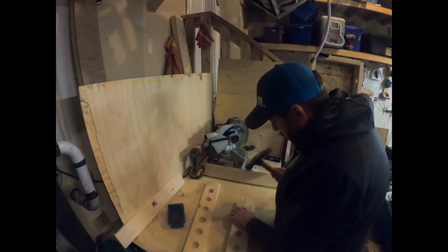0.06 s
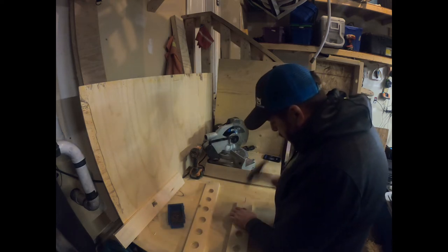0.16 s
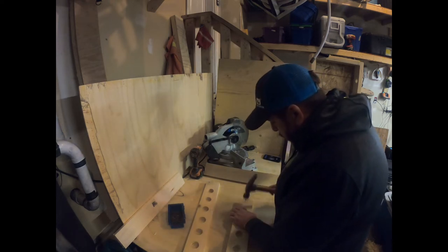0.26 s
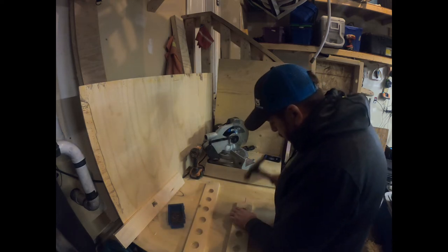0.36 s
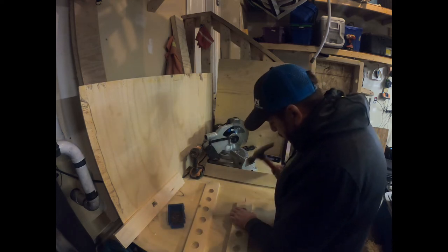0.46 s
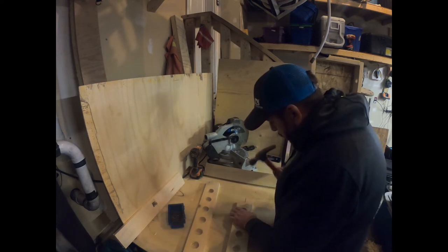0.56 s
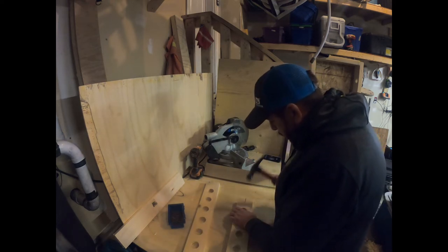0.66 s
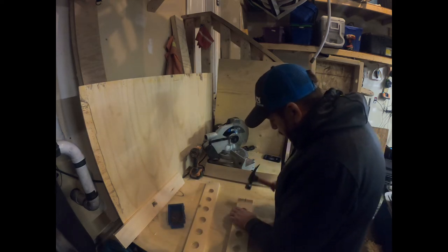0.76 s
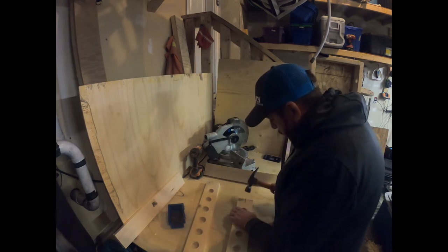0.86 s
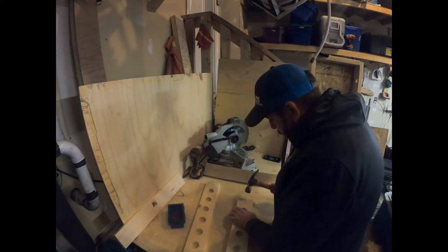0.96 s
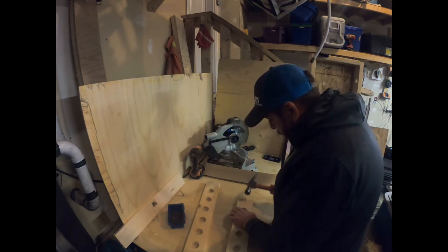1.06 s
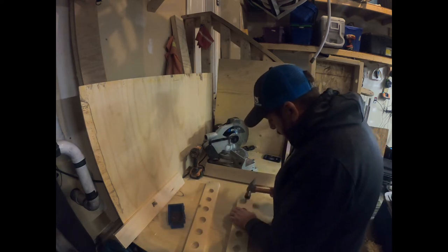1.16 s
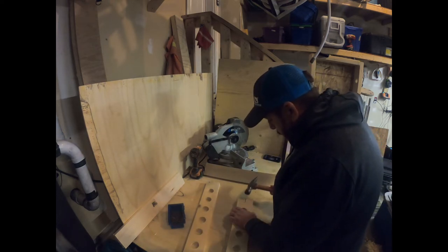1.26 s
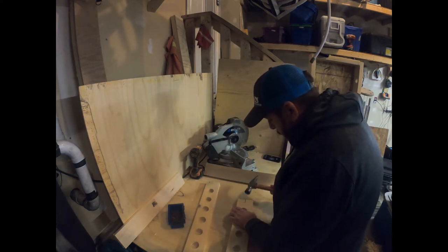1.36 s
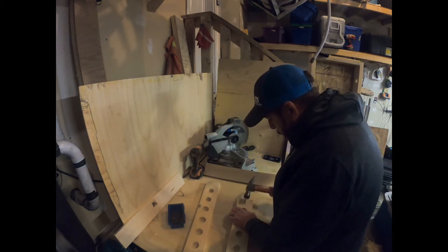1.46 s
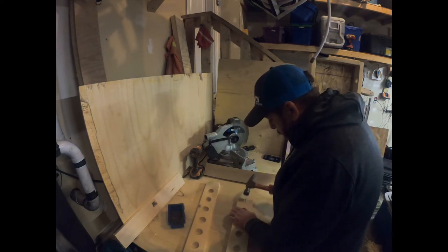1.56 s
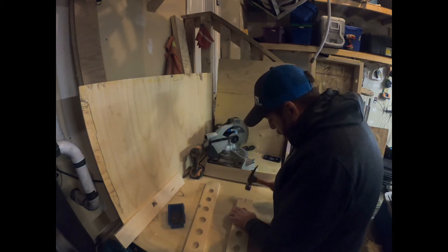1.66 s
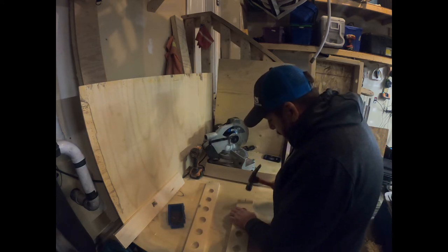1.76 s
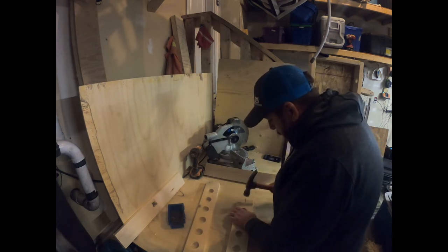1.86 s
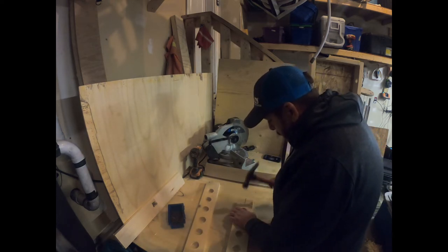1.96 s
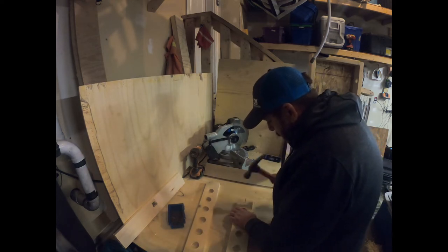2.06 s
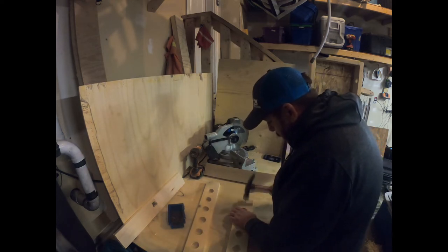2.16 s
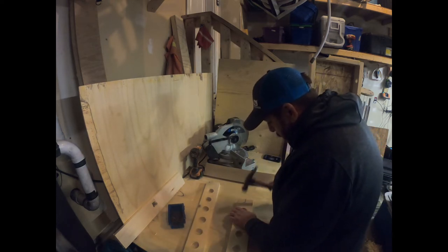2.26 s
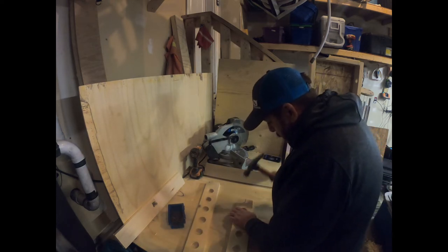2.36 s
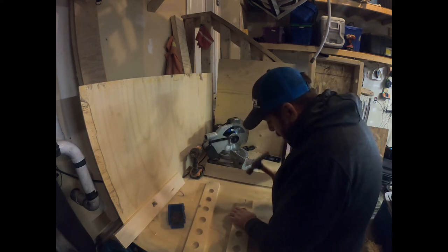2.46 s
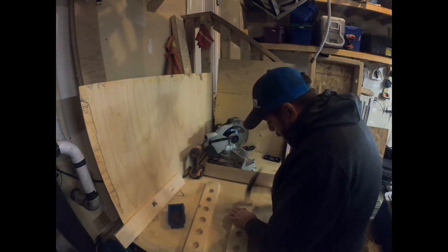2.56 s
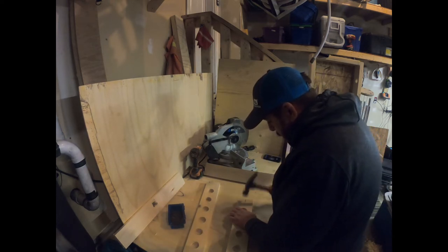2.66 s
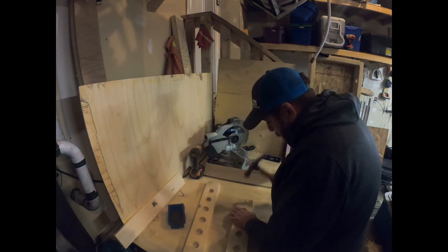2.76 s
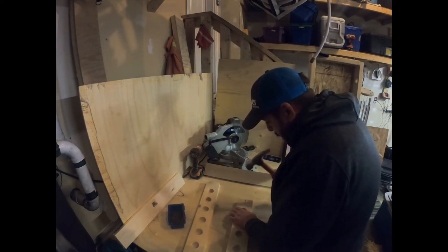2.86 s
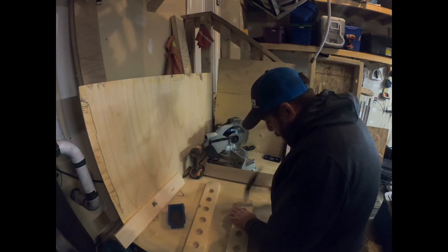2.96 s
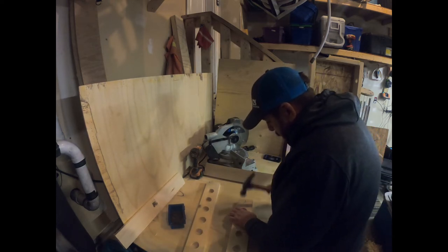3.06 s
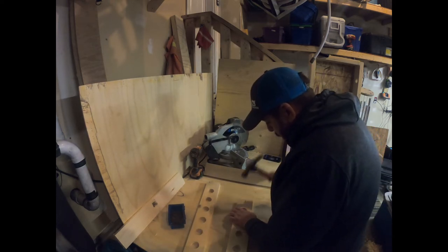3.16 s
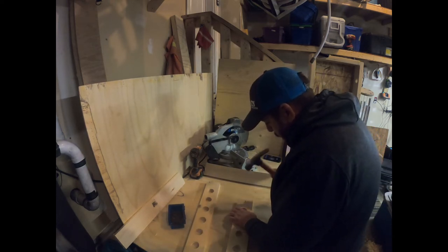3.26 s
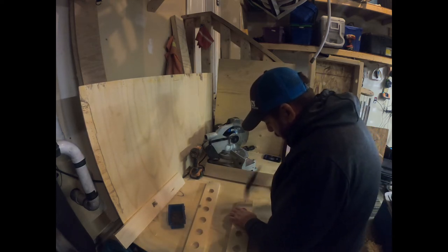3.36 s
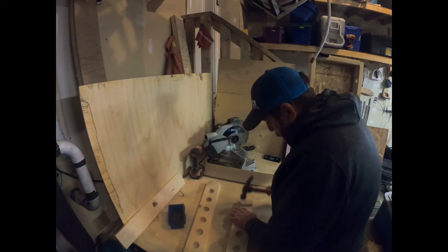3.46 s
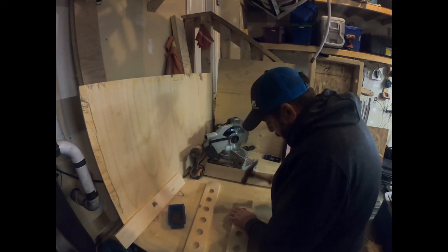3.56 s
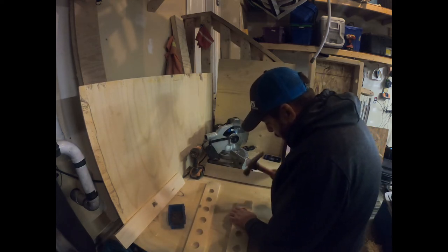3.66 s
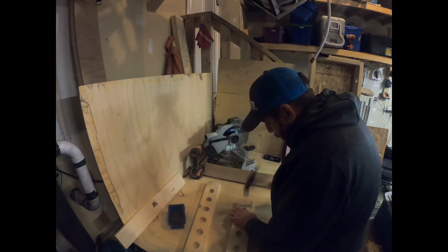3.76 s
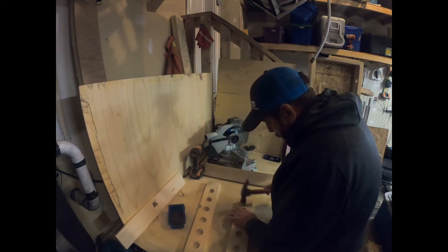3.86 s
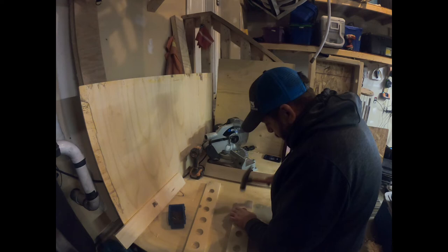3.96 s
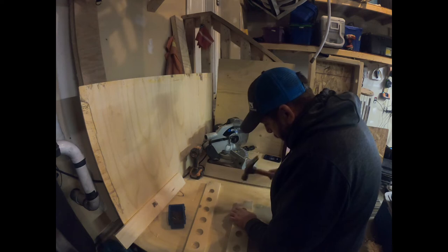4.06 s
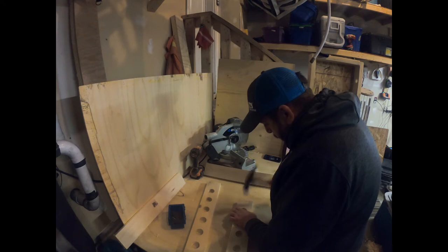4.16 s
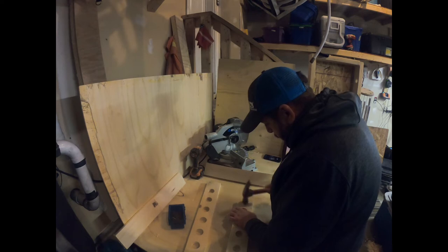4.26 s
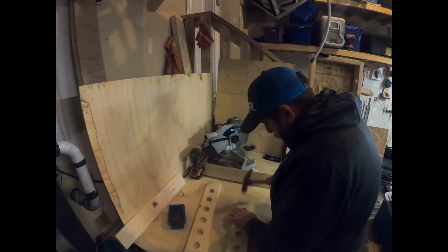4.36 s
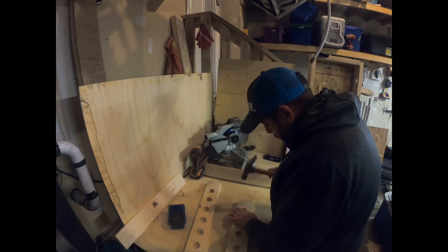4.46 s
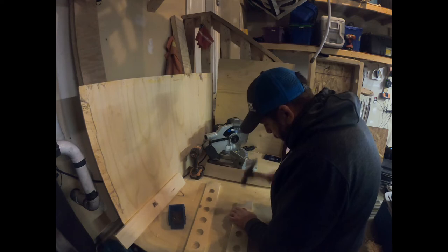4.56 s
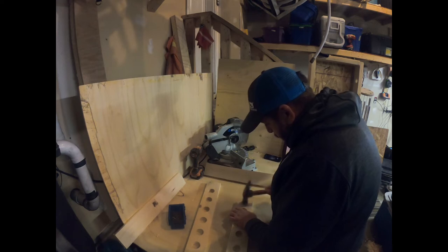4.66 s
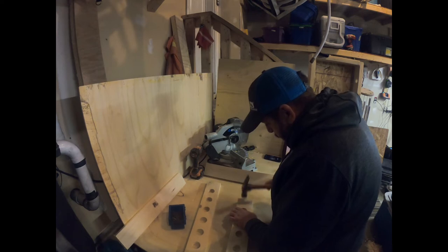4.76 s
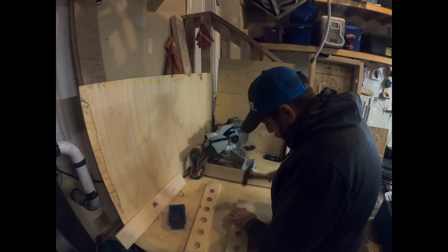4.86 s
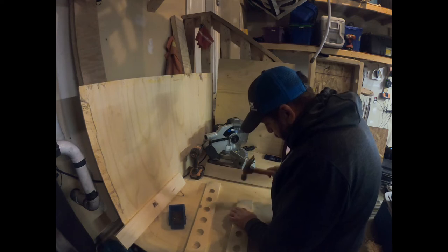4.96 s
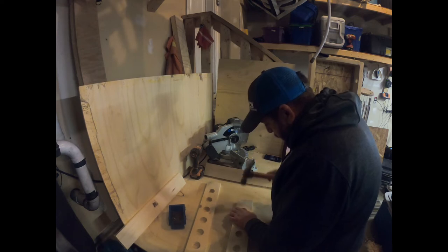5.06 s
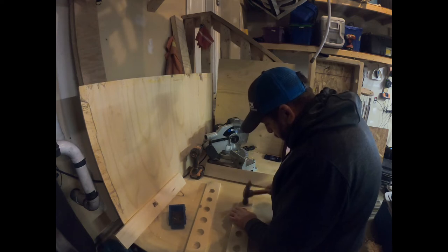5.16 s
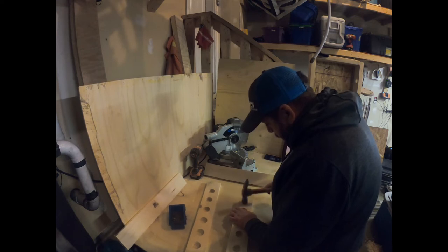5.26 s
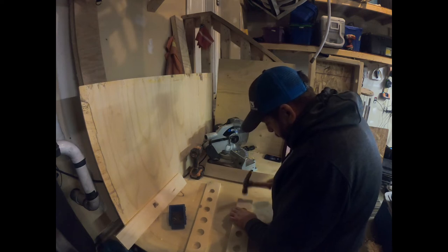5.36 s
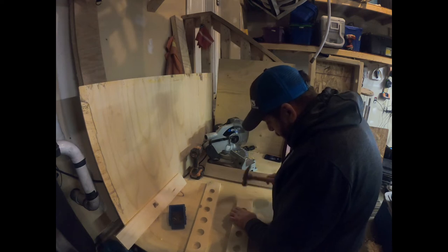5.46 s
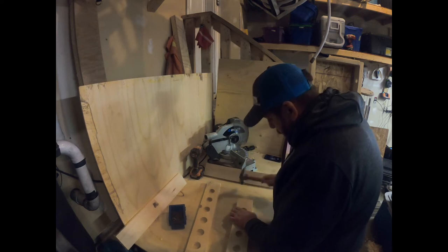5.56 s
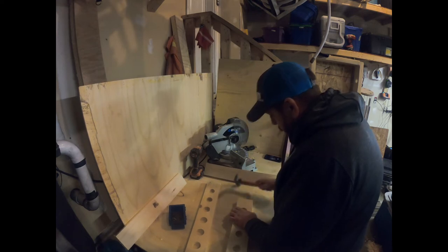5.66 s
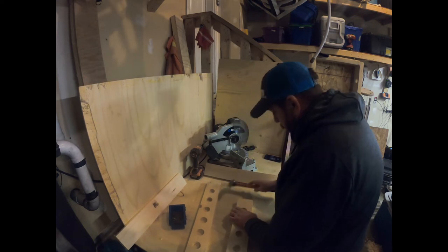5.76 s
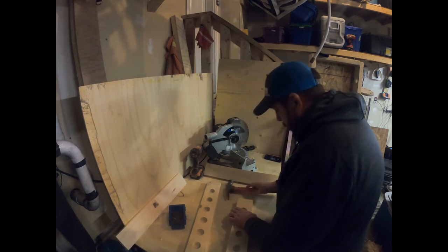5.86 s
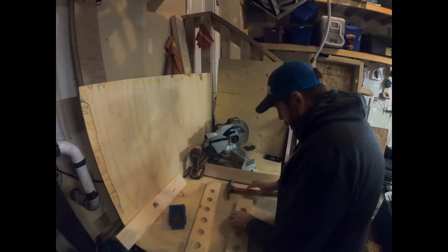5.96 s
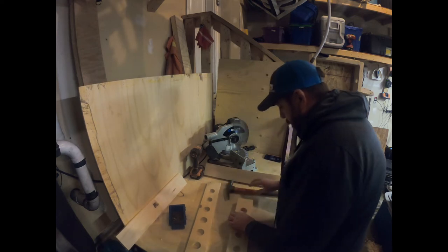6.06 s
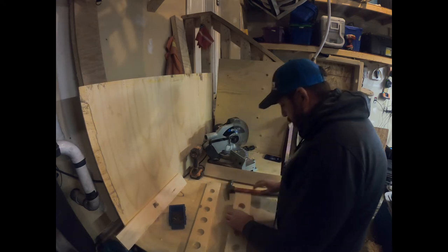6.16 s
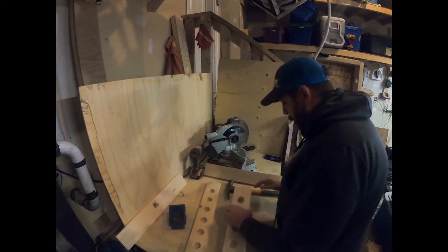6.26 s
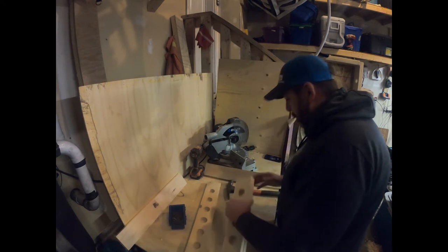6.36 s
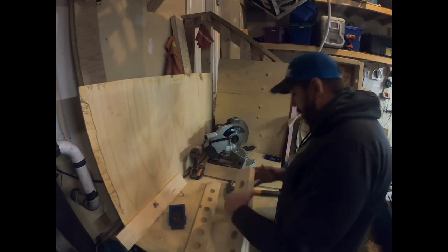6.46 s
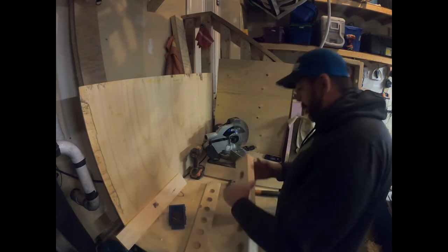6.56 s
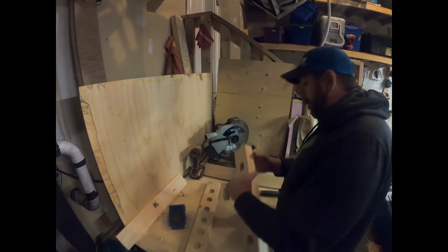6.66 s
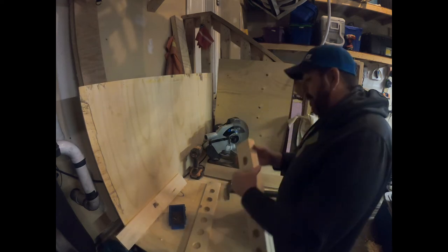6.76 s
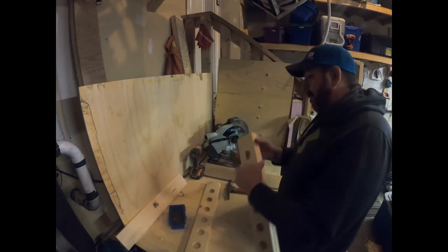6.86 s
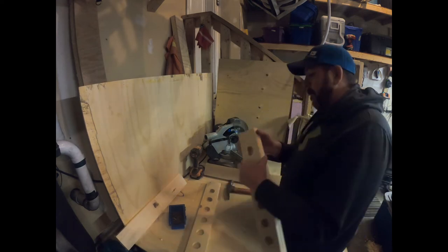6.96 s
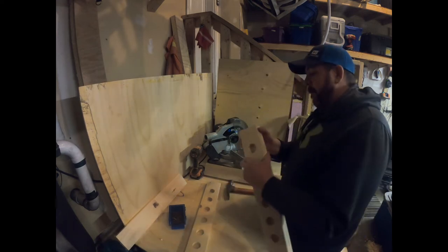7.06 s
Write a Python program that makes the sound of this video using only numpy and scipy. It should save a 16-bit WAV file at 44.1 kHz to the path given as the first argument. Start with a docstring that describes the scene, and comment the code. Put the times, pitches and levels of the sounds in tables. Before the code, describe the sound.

Heard close in stereo in a small workshop, a hammer strikes a nail in wood: one blow, two faint taps, then eight strong evenly spaced blows. Each cracks sharply, booms through the bench and shakes loose things into ticks. The hammer clunks down, then a wooden block drags off with grainy, squeaky friction over quiet hum.

```python
"""Hammering a nail at a workbench

A hammer drives a nail into a block on a wooden bench in a small workshop, heard close by in stereo.
Each blow cracks as ringing steel modes, booms late through the bench and makes loose things jump and land
as clumps of ticks; band-by-band dying noise is the room. Two light taps come between the first two blows.
Then the hammer is laid down and the block slides off as grainy, squeaking friction noise, over a quiet hum."""
import sys
import numpy as np
from scipy import signal
from scipy.io import wavfile

SR = 44100
rng = np.random.default_rng(int(sys.argv[2]) if len(sys.argv) > 2 else 0)


def wrap_up_sound(samples):
    """Save the sound to the file named by the first command line argument, as 16-bit audio."""
    columns = np.atleast_2d(samples).T
    # keep every value between -1 and 1, then stretch to whole-number steps
    tamed = np.clip(columns, -1, 1)
    steps = np.round(tamed * 32767).astype(np.int16)
    wavfile.write(sys.argv[1], SR, steps)


N = 313110

# hammer blows on the nail: start_s, force_db, woody (0 = booming blow, 1 = blow with more woody body),
# bench_shake_db, block_ring_db [s, dB, -, dB, dB]
BLOWS = [(0.2484, 9.5, 0.56, 2.5, -1.5), (2.206, 11, 0.88, 0.5, -3), (2.6225, 14.5, 0, -2.5, 3),
         (3.024, 13, 0, -2.5, 3.5), (3.4271, 9, 0.01, -0.1, 7), (3.8357, 13, 0, -0.7, 2.1),
         (4.243, 10, 0.42, -2, -1.2), (4.6704, 10.5, 0.82, 2.5, -3), (5.1962, 10, 0, -3.5, 6.5)]
# light taps, a touch and then the knock: touch_s, touch_db, knock_s, knock_db [s, dB, s, dB]
TAPS = [(1.165, -27.5, 1.1762, -18.5), (1.483, -27, 1.4915, -16)]
# the hammer tumbles down on the bench: start_s, steel_crack_db, bench_thud_db, woody_knock_db,
# bright_clack_db [s, dB, dB, dB, dB]
SET_DOWN = [(5.7107, -19.5, -14.5, -12, -41), (5.826, -26.5, -19, -15, -51.5),
            (5.8917, -1.5, -6.5, 0.5, -22), (6.0058, -18.5, -19, -8, -38.5), (6.018, -25, -11, -29, -44)]
# loose things landing on the bench, mostly thrown up by a blow: start_s, treble_db, thump_db [s, dB, dB]
LANDINGS = [(0.301, -5.5, -8.5), (0.3124, -19.5, -17), (2.266, -11.5, -17.5), (2.68, -6.5, -9),
            (3.096, -9.5, -22), (3.501, -10.5, -17.5), (3.919, 8.5, 0.5), (4.322, -13, -18),
            (4.754, -14, -29), (4.966, -50.5, -61.5), (5.026, -61.5, -77), (5.049, -64.5, -57.5),
            (5.157, -58, -49), (5.25, -19.5, -25), (5.72, -35, -31), (5.829, -42, -64.5),
            (6.018, -54.5, -65), (6.481, -62, -73)]
# modes of the bench top: pitch_hz, relative level_db, t60_s [Hz, dB, s]
BENCH_MODES = [(142.8, 8.5, 0.12), (188, -1.5, 0.015), (256, -6.5, 0.27)]
# modes of the wood being nailed: pitch_hz, relative level_db, t60_s [Hz, dB, s]
BLOCK_MODES = [(364, -0.5, 0.12), (482, -3, 0.08), (616, 0.5, 0.088), (729, -0.5, 0.1), (850, -4, 0.09),
               (945, -1, 0.06), (1197, -2, .08), (1550, -8.5, .05)]


def amp(db):
    """dB to gain."""
    return 10 ** (np.asarray(db) / 20)


def rms_one(x):
    """Scale to unit rms."""
    return x / np.sqrt(np.mean(x ** 2) + 1e-20)


def at_hz(points, hz, column=1):
    """Read a spectrum table on a log-frequency axis."""
    points = np.array(points)
    return np.interp(np.log(hz), np.log(points[:, 0]), points[:, column])


def in_time(rows, column):
    """Read a curve column at every sample."""
    rows = np.array(rows)
    return np.interp(np.arange(N) / SR, rows[:, 0], rows[:, column])


def clicks(rows, column, extra_db=0):
    """One click per event, sized by a dB column, over an inaudible floor."""
    out, rows = np.full(N, 1e-18), np.array(rows)
    out[np.round(rows[:, 0] * SR).astype(int)] = amp(rows[:, column] + extra_db)
    return out


def butter(x, hz, kind):
    """Second-order Butterworth filter design, low, high or band."""
    return signal.sosfilt(signal.butter(2, hz, kind, fs=SR, output="sos"), x)


def band_noise(hz, width_hz):
    """A narrow band of noise at unit rms."""
    edges_hz = [hz - width_hz / 2, hz + width_hz / 2]
    return rms_one(butter(rng.standard_normal(N), edges_hz, "band"))


def ring(x, hz, t60):
    """A two-pole resonator: a unit click sets a decaying sine of height 1 ringing."""
    r, w = amp(-60 / (t60 * SR)), 2 * np.pi * hz / SR
    return signal.lfilter([0, np.sin(w)], [1, -2 * r * np.cos(w), r * r], x)


def fade(power, t60):
    """Sound energy dying away by 60 dB in t60 seconds."""
    return signal.lfilter([1], [1, -amp(-120 / (t60 * SR))], power)  # -120 because this is power


def flicker(size, per_s):
    """A random curve: straight lines between points of unit spread."""
    knots = rng.standard_normal(int(size / SR * per_s) + 2)
    return np.interp(np.arange(size) / SR * per_s, np.arange(len(knots)), knots)


def stereo_bands(size, gain_at):
    """Third-octave bands of stereo noise, each with its own gain, likeness and balance."""
    # left-right likeness: pitch_hz, likeness (clipped to -1..1) [Hz, -]
    likeness = [(100, 0.99), (300, 1), (600, 0.76), (1200, 0.32), (2500, .6), (5000, 0.25), (9000, -0.24),
                (14000, -2.4)]
    # stereo balance: pitch_hz, left_minus_right_db [Hz, dB]
    left_more = [(60, -1.5), (180, 2), (550, -1), (1650, -1), (4970, 1), (15000, -2)]
    out, edges = 0, 28 * 2 ** (np.arange(28) / 3)
    white = rng.standard_normal((2, 2, size))
    for k, (low, high) in enumerate(zip(edges, edges[1:])):
        mid, side = butter(white[k % 2], [low, high], "band")
        hz = np.sqrt(low * high)
        alike = np.clip(at_hz(likeness, hz), -1, 1)
        lean = amp(at_hz(left_more, hz) / 2)
        left, right = np.sqrt(1 + alike) * mid + np.sqrt(1 - alike) * side * [[1], [-1]]
        out = out + gain_at(hz) * np.array([left * lean, right / lean])
    return out


def contacts():
    """Every knock as (s, force dB, then relative dB of deep boom, bench, body, treble), from its kind."""
    # how each kind of contact shares its force: deep_db, bench_db, body_db, treble_db [relative dB]
    booming_blow, woody_blow = [-7.5, -14, -10.5, -19.5], [-18.5, -18, -1, -19.5]
    touch_share, tap_share = [-45, -32, -5, -5], [-41, -35, -6, -14]
    # the laid-down hammer, without treble: deep_db, bench_db, body_db [relative dB]
    thud_share = [-22.5, -10, -1.5]
    rows = []
    for s, db, woody, shake_db, block_db in BLOWS:
        blow_share = np.add(booming_blow, woody * np.subtract(woody_blow, booming_blow))
        rows.append((s, db, *(blow_share + [shake_db, shake_db, block_db, 0])))
    for touch_s, touch_db, knock_s, knock_db in TAPS:
        rows.append((touch_s, touch_db, *touch_share))
        rows.append((knock_s, knock_db, *tap_share))
    for s, db, thud_db, wood_db, clack_db in SET_DOWN:
        share = np.add(thud_share, [thud_db - db, thud_db - db, wood_db - db])
        rows.append((s, db, *share, clack_db - db))
    return np.array(rows)


def knocks(column, extra_db=0):
    """One click per knock: its force plus the share of one range; column 1 is the bare force."""
    rows = contacts()
    share_db = rows[:, column] if column > 1 else 0
    return clicks(rows, 1, extra_db + share_db)


def struck(modes, column, spread_db):
    """Every knock strikes every mode with its own strength; neighbouring modes start in opposite directions."""
    spread = rng.normal(0, spread_db, (len(contacts()), len(modes)))
    out = 0
    for k, (hz, db, t60) in enumerate(modes):
        out = out + (-1) ** k * ring(knocks(column, db + spread[:, k]), hz, t60)
    return out


def landings():
    """Each landing as (s, treble dB, body dB), the body 9 dB over the treble."""
    return np.array([(s, db, db + 9) for s, db, _ in LANDINGS])


def hum():
    """A wavering hum and faint flickering hiss: shaped noise whose bands waver together and apart."""
    # pitch_hz, relative level_db per Hz [Hz, dB]
    hum_colour = [(18, -29), (30, -8.5), (110, -11), (158, 2.5), (267, -8), (552, -20.5), (645, -8),
                  (698, -36.5), (837, -5.5), (1140, -22.5), (3880, -27.5), (4200, -19), (6040, -35.5),
                  (7630, -17.5), (15000, -60.5)]
    together = flicker(N, per_s=3.9)

    def gain(hz):
        return amp(at_hz(hum_colour, hz) + 1.0 * together + 1.3 * flicker(N, per_s=3.4))
    return amp(-70) * rms_one(stereo_bands(N, gain))


def crack():
    """A few ms of steel on nail head and block with a bright ping, straight and again off bench and board."""
    # steel meets nail head and block: pitch_hz, relative level_db, t60_s [Hz, dB, s]
    crack_modes = [(2600, 0, 0.007), (3500, -8, 0.01), (1850, -3, 0.01), (1215, -5, .016), (700, -8, .012)]
    # bright ring of the hammer head: pitch_hz, relative level_db, t60_s [Hz, dB, s]
    ping_modes = [(4440, 5, 0.0031), (6150, 2, 0.0043), (6880, -2.5, 0.036), (7100, 1, 0.0067),
                  (8370, -4, 0.063)]
    # direct, off the bench top, off the back board: delay_s, relative level_db, left_minus_right_db [s, dB, dB]
    arrivals = [(.0008, -3, -6), (.00117, -3, -6), (.0023, 4, 0)]
    # the contact is not quite instant, which softens it above 3800 Hz
    snap = butter(struck(crack_modes, column=1, spread_db=2.5), 3800, "low")
    ping = amp(-2) * struck(ping_modes, column=5, spread_db=4.0)
    direct = ping - snap
    out = 0
    for s, db, lean_db in arrivals:
        left_right = amp(db + np.array([[lean_db / 2], [-lean_db / 2]]))
        out = out + left_right * np.roll(direct, round(s * SR))
    return amp(-13) * out


def boom(delay_s=0.0049):
    """The heavy bench gives way late and softly, slowest on its legs; its edge and the block answer at once."""
    # bench on its legs: pitch_hz, relative level_db, t60_s [Hz, dB, s]
    leg_modes = [(46, -13, 0.26), (61.6, -10.5, 0.26), (94.3, 5.5, 0.086)]
    # bench where the hammer is laid: pitch_hz, relative level_db, t60_s [Hz, dB, s]
    edge_modes = [(165.4, 3, 0.09), (284, -5, 0.083), (380.4, -2.5, 0.088), (494, -8, 0.051)]
    legs = amp(5.0) * butter(struck(leg_modes, column=2, spread_db=2.5), 110, "low")
    top = amp(3.5) * struck(BENCH_MODES, column=3, spread_db=1.9)
    late = np.roll(butter(legs + top, 800, "low"), round(delay_s * SR))
    edge = sum(ring(clicks(SET_DOWN, 2, db - 1), hz, t60) for hz, db, t60 in edge_modes)
    block = amp(-19) * butter(struck(BLOCK_MODES, column=4, spread_db=5.5), 1800, "low")
    return late - butter(edge, 700, "low") + block


def shudder():
    """Bench and shelves keep shaking unevenly: noise in low resonances, dying slowly after each blow."""
    # pitch_hz, width_hz, relative level_db, t60_s [Hz, Hz, dB, s]
    resonances = [(153, 60, -36.5, 0.73), (268, 58, -35, 0.55)]
    power = clicks(BLOWS, column=1) ** 2
    out = 0
    for hz, width_hz, db, t60 in resonances:
        out = out + amp(db) * np.sqrt(fade(power, t60)) * band_noise(hz, width_hz)
    return out


def steel(damped_db=-10):
    """The nail sings faintly, less on the woodier blows; light taps ring in wood and a loose piece answers."""
    # nail and hammer head: pitch_hz, relative level_db, t60_s [Hz, dB, s]
    nail_modes = [(1432, -77, 1.2), (2935, -79, 1.5)]
    # what a light tap sets ringing: pitch_hz, relative level_db, t60_s [Hz, dB, s]
    wood_modes = [(200.5, -4.5, .12), (703, -3, 0.047), (1980, -5, 0.015), (6170, -19, 0.05)]
    # something loose ringing after a tap: pitch_hz, relative level_db, t60_s [Hz, dB, s]
    loose_modes = [(1240, -12.5, 0.075), (894, -20, 0.1), (295, -10, 0.16)]
    blows = np.array(BLOWS)
    nail = sum(ring(clicks(blows, 1, db + damped_db * blows[:, 2]), hz, t60) for hz, db, t60 in nail_modes)
    taps = np.array(TAPS)[:, 2:]
    wood = sum(ring(clicks(taps, 1, db), hz, t60) for hz, db, t60 in wood_modes)
    late_taps = taps + [0.022, 0]  # seconds
    loose = sum(ring(clicks(late_taps, 1, db), hz, t60) for hz, db, t60 in loose_modes)
    return nail + wood + loose


def workshop():
    """Boards and walls answer knocks and landings with dense noise: a quick early part and tails per band."""
    # pitch_hz, relative level_db, t60_s [Hz, dB, s]
    room_bands = [(41.3, -7.5, 0.059), (83, 11.5, 0.36), (141, 22.5, 0.18), (264, 14.5, 0.29),
                  (694, 1, 0.27), (1615, -7, 0.26), (2280, -13, 0.27), (4300, -10, 0.25),
                  (8700, -6.5, 0.23), (9800, -15.5, 0.031), (15000, -20, 0.042)]
    # centres of the deep, bench, body, crack and treble ranges [Hz]
    range_hz = [70, 200, 750, 2500, 6500]
    first_wall_s, landing_delay_s, landing_room_db = 0.003, 0.005, -4.5
    early_db, early_t60_s = -4, 0.0063
    late_db, late_t60_s, late_top_hz = -30, 0.62, 3470  # far corners ring on, softer and duller
    blows, drops = contacts(), landings()
    shares = np.insert(blows[:, 2:], 3, 0, axis=1)  # the crack range takes the bare force

    def struck_power(hz):
        share_db = np.array([np.interp(np.log(hz), np.log(range_hz), row) for row in shares])
        knocked = np.roll(clicks(blows, 1, share_db), round(first_wall_s * SR))
        # landings: weak lows, then a blend from body to treble level, reaching treble at 5 kHz
        tilt = np.interp(np.log(hz), np.log([400, 1500, 3000, 5000]), [-15, 0, 0, 1])
        blend_db = drops[:, 2] + (drops[:, 1] - drops[:, 2]) * max(tilt, 0)
        landed_db = blend_db + min(tilt, 0) + landing_room_db
        landed = clicks(np.c_[drops[:, 0] + landing_delay_s, landed_db], column=1)
        return knocked ** 2 + landed ** 2

    def dying(hz):
        # energy builds over a cycle or two plus a fraction of a ms
        swell = np.exp(-hz / (1.5 * SR + 0.00015 * hz * SR))
        power = signal.lfilter([1 - swell], [1, -swell], struck_power(hz))
        early = amp(2 * early_db) * fade(power, early_t60_s)
        tail = fade(power, at_hz(room_bands, hz, column=2))
        late = amp(2 * late_db) / (1 + (hz / late_top_hz) ** 2) * fade(power, late_t60_s)
        patchy_db = 2.6 * flicker(N, per_s=35) + 2.0 * flicker(N, per_s=11)
        return amp(at_hz(room_bands, hz) + patchy_db) * np.sqrt(early + tail + late)
    return stereo_bands(N, dying)


def rattles(spread_s=0.004, per_s=4000):
    """Each landing is a clump of uneven ticks that swells over some ms and thins out."""
    t = np.arange(int(.1 * SR)) / SR / spread_s
    shape = t * np.exp(1 - t)
    present = rng.random((2, N)) < per_s / SR
    size = amp(3.59 * rng.exponential(1, (2, N)))
    ticks = rms_one(present * size * rng.choice([-1, 1], (2, N)))
    treble = butter(butter(ticks, [3000, 10000], "band"), 8300, "low")
    body = butter(ticks, [900, 3500], "band")
    treble_swell = signal.fftconvolve(clicks(landings(), column=1), shape)[:N]
    body_swell = signal.fftconvolve(clicks(landings(), column=2), shape)[:N]
    return amp(2.5) * (treble_swell * treble + body_swell * body)


def thumps():
    """Landings also knock the modes of bench and block, softly."""
    rings = 0
    for k, (hz, db, t60) in enumerate(BENCH_MODES + BLOCK_MODES):
        rings = rings + (-1) ** k * ring(clicks(LANDINGS, 2, db), hz, t60)
    return butter(rings, 1100, "low")


def low_swells():
    """The low hum grows and fades at times: a narrow noise band under arching envelopes."""
    # start_s, length_s, level_db [s, s, dB]
    swells = [(.5, 0.49, -60.5), (1.6, 1, -84.5)]
    t = np.arange(N) / SR
    envelope = 0
    for s, length, db in swells:
        part = np.clip((t - s) / length, 0, 1)
        envelope = envelope + amp(db) * np.sqrt(np.abs(np.sin(np.pi * part)))
    return envelope * band_noise(hz=156, width_hz=27)


def slide():
    """Grainy friction noise as the block is dragged: strokes rise, hold and fade; sleeves rustle below."""
    # pitch_hz, relative level_db per Hz [Hz, dB]
    friction_colour = [(120, -36), (200, -7.5), (360, -7), (658, -14.5), (759, -9), (1520, -13),
                       (2500, -13), (8360, -22.5), (14000, -49)]
    # sleeves brushing, a level curve: time_s, level_db before the grain [s, dB]
    sleeves = [(5.3, -89), (5.5, -67), (6.2, -63), (7.1, -66)]
    # drags of the block: start_s, length_s, level_db before the grain [s, s, dB]
    strokes = [(6.31, 0.26, -65.5), (6.452, 0.082, -53.5), (6.645, 0.28, -68.5)]
    attack_s, release_s = 0.034, 0.025
    t = np.arange(N) / SR
    broad = rms_one(stereo_bands(N, lambda hz: amp(at_hz(friction_colour, hz) + 3.2 * flicker(N, per_s=27))))
    out = amp(in_time(sleeves, column=1)) * broad
    for s, length, db in strokes:
        rise = np.clip((t - s) / attack_s, 0, 1)
        fall = np.exp(-np.maximum(t - s - length, 0) / release_s)
        out = out + amp(db) * rise * fall * broad
    grain = amp(1.3 * flicker(N, per_s=250))
    return grain * out


def squeaks(waver_per_s=220):
    """Rubbing makes narrow wavering tones that glide and come and go; touching things make short dry ticks."""
    # start_s, length_s, level_db before the waver, from_hz, to_hz [s, s, dB, Hz, Hz]
    glides = [(6.311, 0.14, -67, 782, 790), (6.33, .06, -68, 2480, 2440), (6.44, 0.146, -64, 2347, 2560),
              (6.46, .13, -66, 790, 780), (6.687, 0.13, -67, 3580, 3620), (6.79, .06, -69, 3750, 3780),
              (6.78, .12, -69, 1970, 2060)]
    # start_s, level_db, pitch_hz [s, dB, Hz]
    dry_ticks = [(6.4802, -45, 3400), (6.482, -48, 4100), (6.52, -54, 2620), (6.548, -48.5, 2510),
                 (6.789, -57.5, 2030)]
    t = np.arange(N) / SR
    waver = amp(5.5 * flicker(N, waver_per_s))  # level, dB
    wobble = 1.4 * flicker(N, waver_per_s)  # phase, radians
    # a tick dies by 60 dB in 130 cycles
    out = sum(ring(clicks([(s, db)], column=1), hz, 130 / hz) for s, db, hz in dry_ticks)
    for s, length, db, from_hz, to_hz in glides:
        part = np.clip((t - s) / length, 0, 1)
        cycles = length * part * (from_hz + (to_hz - from_hz) * part / 2)
        tone = np.sin(2 * np.pi * cycles + wobble)
        envelope = np.sqrt(np.abs(np.sin(np.pi * part))) * (part < 1)
        out = out + amp(db) * envelope * waver * tone
    return out


def scene():
    """Near sounds, their answer from the room, and the background."""
    near = crack() + boom() + shudder() + steel() + rattles() + thumps()
    return near + workshop() + slide() + squeaks() + hum() + low_swells()


def limiter(x):
    """Gain starts to drop just ahead of a peak and creeps back at a steady dB rate, stretching loud tails."""
    limit_db, release_db_per_s = -5.5, 110
    look_ahead_s, attack_s = 0.0003, 0.0015
    over_db = np.maximum(20 * np.log10(np.abs(x).max(axis=0) + 1e-9) - limit_db, 0)
    creep = release_db_per_s * np.arange(N) / SR
    held_db = np.maximum.accumulate(over_db + creep) - creep
    ahead_db = np.roll(held_db, -round(look_ahead_s * SR))
    r = np.exp(-1 / (attack_s * SR))
    return x * amp(-signal.lfilter([1 - r], [1, -r], ahead_db))


def record(dry):
    """The microphone dulls both ends, the limiter acts, peaks round off, the top is cut."""
    headroom, cutoff_hz = 0.97, 15900
    dulled = butter(butter(dry, 46, "high"), 9800, "low")
    rounded = headroom * np.tanh(limiter(dulled) / headroom)
    return signal.sosfilt(signal.cheby2(12, 70, cutoff_hz, fs=SR, output="sos"), rounded)


dry = scene()
out = record(dry)
wrap_up_sound(out)
```